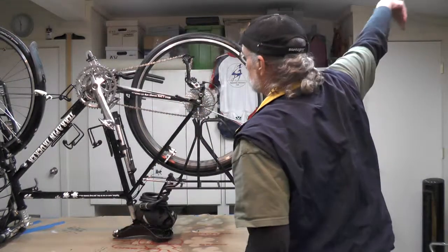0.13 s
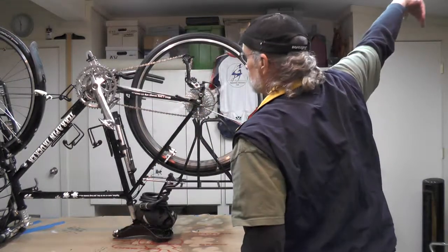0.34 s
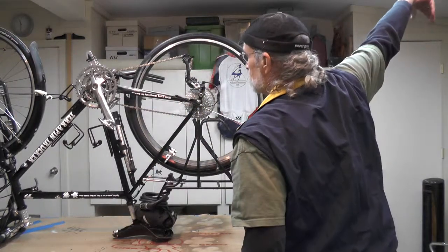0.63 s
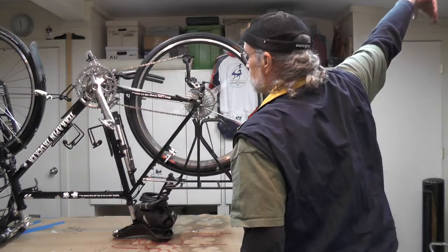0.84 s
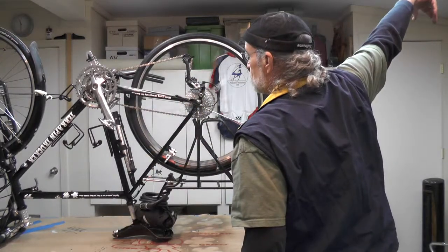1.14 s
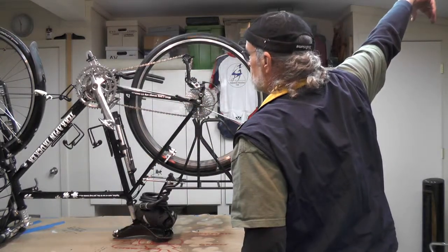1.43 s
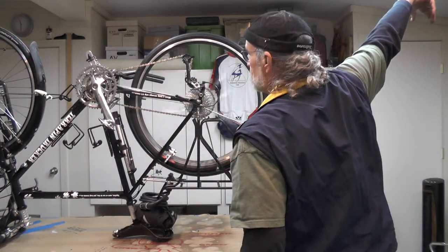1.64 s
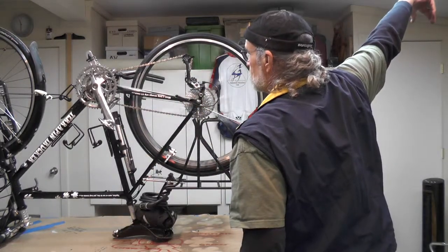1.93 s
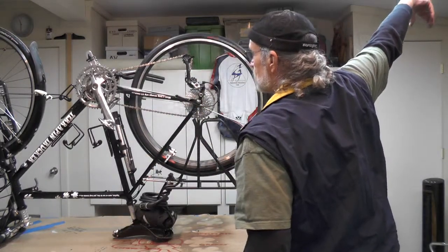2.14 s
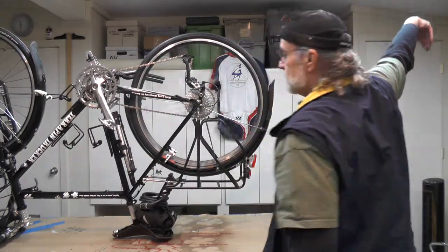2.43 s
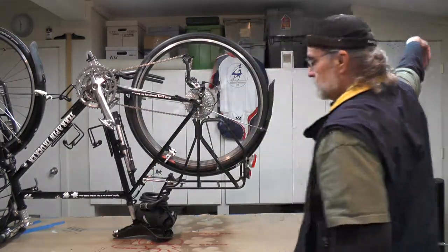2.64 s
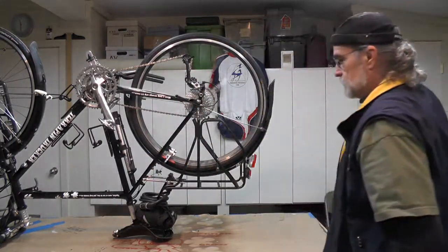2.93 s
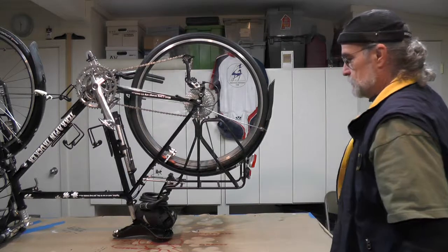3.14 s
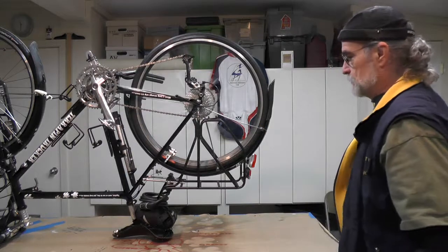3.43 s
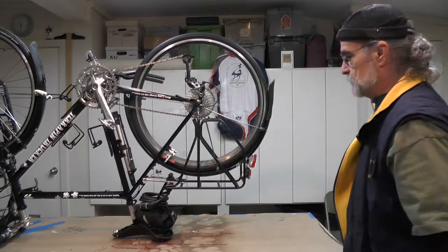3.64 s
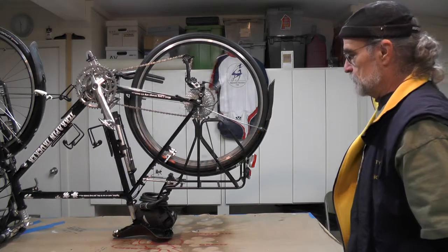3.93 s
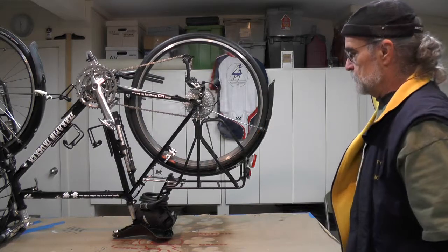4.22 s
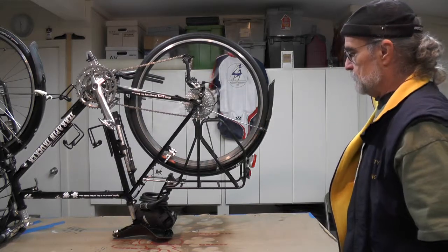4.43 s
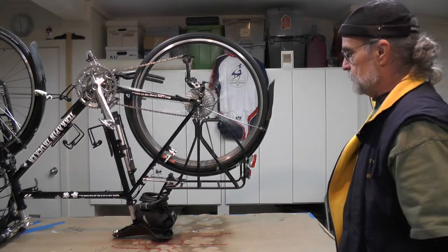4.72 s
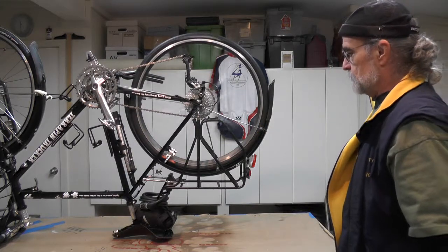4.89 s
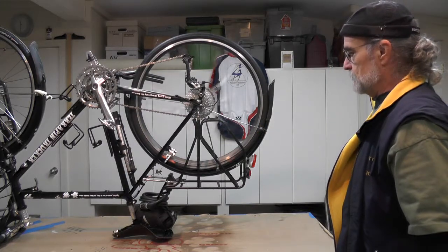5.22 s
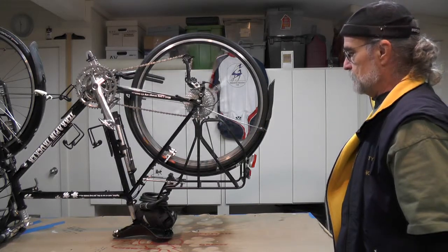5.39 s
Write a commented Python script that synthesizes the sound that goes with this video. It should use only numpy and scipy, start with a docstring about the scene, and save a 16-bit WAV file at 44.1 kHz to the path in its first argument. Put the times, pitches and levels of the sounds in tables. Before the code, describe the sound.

A spinning rear wheel coasts throughout, its pawls ticking in a dense, crisp, ringing whirr with a gentle pulse at each turn. Around the middle a single short knock sounds, followed by a muffled scuff as a man steps back. The microphone hears it fairly close, mostly centred, with diffuse indoor reflections and quiet low background noise.

```python
"""In a small workshop a bicycle stands upside down on a bench; its rear wheel coasts, slowly losing speed.
Three pawls snap over the freewheel's teeth: filtered impulses are the snaps, noise bursts the ringing hub,
and decaying cosines the sprockets and wheel. A diffuse room response blends the ticks to a buzz.
A man steps back from the bench: a soft rustle as his hand leaves the wheel, one dry knock of a filtered
impulse with a noise rattle, and footfalls of shaped noise, over a low room rumble of filtered noise."""
import sys
import numpy as np
from scipy import signal
from scipy.fft import rfft, irfft
from scipy.io import wavfile
from scipy.ndimage import uniform_filter1d

SR = 44100
rng = np.random.default_rng(int(sys.argv[2]) if len(sys.argv) > 2 else 0)


def persist_wave(psi):
    """Save psi, clipped to +-1, as 16-bit WAV."""
    counts = np.round(np.clip(psi, -1, 1) * 32767).astype(np.int16)
    wavfile.write(sys.argv[1], SR, np.atleast_2d(counts).T)


N = 244755

# Steady room rumble, spectrum: frequency_hz, level_db
RUMBLE_SPECTRUM = [(12, -38), (20, -5), (43, -14), (76, 0.5), (108, -5.5), (211, -7), (244, -5.5),
                   (357, -9.5), (381, -12.5), (665, -12), (900, -14.5), (1170, -21), (1980, -120)]
# Side signal of the rumble against its mid: frequency_hz, level_db
RUMBLE_SIDE = [(30, -8), (70, -16), (130, -6), (250, -2.5), (600, -0.5)]
# Reverberation time of the room: frequency_hz, t60_s
ROOM_DECAY = [(200, 0.4), (1000, 0.27), (3000, 1), (8000, 0.97), (16000, 0.54)]
# Side level of the reverberation: frequency_hz, level_db
REVERB_SIDE = [(100, -8), (500, -6), (1200, -14), (2500, -16), (3600, -24), (5000, -28), (7200, -24),
               (8100, -9), (9000, -9), (10500, -28)]
# Echoes from frame, bench and walls: delay_s, level_db
EARLY_ECHOES = [(.0008, -13), (.0029, -14), (.00595, -8), (.0138, -20), (.016, -17)]
# Soft movements of the man, a rustle as his hand leaves the wheel, then footfalls:
# peak_s, level_db, rise_s, fall_s, thud_hz, brush_db (relative to the thud)
SOFT_MOVEMENTS = [(.02, -58.5, .04, .08, 210, 7), (3.29, -54, .025, .04, 370, 4),
                  (4.53, -63, .02, .04, 135, -20), (5.13, -61, .015, .03, 130, -20)]
# Brushing noise of the movements, spectrum: frequency_hz, level_db
BRUSH_SPECTRUM = [(60, -35), (300, -6), (650, -1), (1300, 0), (2200, -9), (6000, -40)]
# Dry knock, spectrum: frequency_hz, level_db
KNOCK_SPECTRUM = [(100, -34), (350, -9.5), (800, -6.5), (1400, 1), (2600, 2), (3600, -2), (6000, -38),
                  (15000, -50)]
# Pawls on the off-centre ratchet ring, early and late once a turn:
# lag_s, swing_s, latest_at (share of a turn), level_db
PAWL_TIMING = [(0, .00032, .68, 0), (.00105, .00098, .93, -4), (.00065, .0006, .88, -8)]
# Bare snap of a pawl, spectrum: frequency_hz, level_db
SNAP_SPECTRUM = [(300, -60), (1500, -32), (3000, -20), (5500, -16), (7200, -2), (8400, 1), (9800, -4),
                 (11200, -12), (15800, -10)]
# Dense, short ring of the hub shell, spectrum: frequency_hz, level_db
HUB_SPECTRUM = [(200, -27), (600, -18), (980, -24), (1200, -14), (1950, -9), (2400, -1.5), (2800, 0.5),
                (3250, 0), (4400, -1.5), (5600, -4), (8300, 1), (9700, -3), (11000, -5), (15600, -5)]
# Broad resonances of the hub: frequency_hz, width_hz, lift_db
HUB_RESONANCES = [(6720, 240, 5), (7800, 200, 2), (8550, 300, 2), (10320, 280, 6), (12650, 850, 6)]
# Modes of the sprockets: frequency_hz, level_db, t60_s
SPROCKET_MODES = [(2576, -2, .07), (2705, 0, .08), (2842, 0, .08), (2939, -3, .1), (3142, -6, .07),
                  (6737, -4, .05), (7060, -8, .06), (7409, -9, .06), (7800, -5, .07), (8182, -7, .12),
                  (8337, -5, .08), (8463, -4, .1), (8650, -4, .07), (12672, -12, .1)]
# Bending modes of the wheel, which turn with it: frequency_hz, level_db, t60_s
WHEEL_MODES = [(1152, 0, .11), (1265, -5, .08), (1351, -3, .09), (1640, -4, .05)]
# The off-centre ring lifts the pawls higher once a turn, and they land harder as the wheel slows.
# Force of the snaps: level_db, gain_db_per_s, swing_db, hardest_at (share of a turn)
SNAP_FORCE = (-29.5, 0.1, 1.4, -1.1)
# Force of the ringing: level_db, gain_db_per_s, swing_db, hardest_at (share of a turn)
RINGING_FORCE = (-31.5, .33, 0.45, 0.96)

# tooth rate at the first tooth, and the time constant of its exponential fall
TEETH, FIRST_S, TEETH_PER_S, COAST_S = 24, .02124, 37.5343, 40.2385
UNEVEN_DB = .7  # spread of the blows from tooth to tooth
TIME = np.arange(N) / SR  # s
TURNS = TEETH_PER_S * COAST_S * (1 - np.exp(-TIME / COAST_S)) / TEETH  # of the wheel, so far


def amp(db):
    """Decibel law: an amplitude ratio is ten to the level over twenty."""
    return 10 ** (np.asarray(db) / 20)


def unit(x):
    """Normalisation: scales the root mean square to 1."""
    return x / np.sqrt(np.mean(x ** 2) + 1e-20)


def read(points, hz):
    """Interpolation: reads a spectrum table on a log-frequency axis."""
    f, value = np.transpose(points)
    return np.interp(np.log(hz + 1), np.log(f + 1), value)


def convolve(x, response):
    """Circular convolution: the overhang wraps round, so everything already rings at the start."""
    y = signal.fftconvolve(x, response)
    overhang = np.pad(y[N:], (0, 2 * N - len(y)))
    return y[:N] + overhang


def colour(x, points, humps=(), size=8192):
    """Minimum phase: the Hilbert transform of the log spectrum gives a causal filter."""
    hz = abs(np.fft.fftfreq(size, 1 / SR))
    db = read(points, hz)
    for f, width, lift in humps:
        db = db + lift / (1 + (2 * (hz - f) / width) ** 4)
    log_spectrum = np.conj(signal.hilbert(np.log(amp(db))))
    response = np.fft.ifft(np.exp(log_spectrum)).real
    return convolve(x, response[:size // 2])


def rumble(level_db=-57.5):
    """Stationary noise: filtered mid and side signals give a room rumble nearly mono in the bass."""
    mid = unit(colour(rng.standard_normal(N), RUMBLE_SPECTRUM))
    side = unit(colour(rng.standard_normal(N), RUMBLE_SPECTRUM))
    side = colour(side, RUMBLE_SIDE)
    return amp(level_db) * (mid + np.array([side, -side]))


def flatten(response, width_hz):
    """Spectral whitening: evens out the broad colour of a random response, keeps its fine ripple."""
    z = rfft(response, 2 * len(response))
    bins = max(3, int(width_hz * 2 * len(response) / SR))
    power = uniform_filter1d(abs(z) ** 2, bins)
    return irfft(z / np.sqrt(abs(power) + 1e-12))[:len(response)]


def tail(build_s=0.0083):
    """Diffuse reverberation: builds up quickly, then each band dies at its own speed."""
    hz, t, z = signal.stft(rng.standard_normal(SR // 2), SR, nperseg=256)
    fading = z * amp(-60 * t / read(ROOM_DECAY, hz)[:, None])
    decay = signal.istft(fading, SR, nperseg=256)[1]
    swell = 1 - np.exp(-(TIME[:len(decay)] / build_s) ** 2)
    return flatten(decay * swell, width_hz=70)


def workshop(x, count=5):
    """Time-varying multipath: the wheel throws ticks along other paths into a mostly narrow, diffuse tail."""
    send = colour(x, [(5000, 0), (13000, -6)])  # frequency_hz, level_db
    tooth = TEETH * TURNS
    shares = rng.standard_normal((int(tooth[-1]) + 2, count))
    paths = np.array([np.interp(tooth, np.arange(len(share)), share) for share in shares.T])
    paths = paths / np.linalg.norm(paths, axis=0)  # the total power stays the same
    mid = sum(convolve(send * path, tail()) for path in paths)
    side = colour(convolve(send, tail()), REVERB_SIDE)
    return mid + np.array([side, -side])


def near(x):
    """Early reflection: delayed, weaker copies follow the direct sound."""
    out = x.copy()
    for delay_s, db in EARLY_ECHOES:
        out += amp(db) * np.interp(TIME - round(delay_s * SR) / SR, TIME, x, left=0)
    return out


def movements():
    """Soft contact and friction: each movement is an octave-wide thud with a brushing noise."""
    out = np.zeros(N)
    for s, db, rise, fall, hz, brush_db in SOFT_MOVEMENTS:
        edges = [hz / np.sqrt(2), hz * np.sqrt(2)]
        band = signal.butter(2, edges, "bandpass", fs=SR, output="sos")
        thud = signal.sosfilt(band, rng.standard_normal(N))
        brush = colour(rng.standard_normal(N), BRUSH_SPECTRUM)
        press = np.exp(-np.maximum((s - TIME) / rise, (TIME - s) / fall))
        out += amp(db) * press * (unit(thud) + amp(brush_db) * unit(brush))
    return out


def knock(start_s=2.547, snap_db=-3.5, rattle_db=-33, rattle_t60_s=.16):
    """Impulse excitation: one dry, woody snap and a brief rattle; both levels apply before the filter."""
    at = round(start_s * SR)
    rattle = amp(rattle_db - 60 * TIME[:N - at] / rattle_t60_s)
    blow = np.zeros(N)
    blow[at:] = rattle * rng.standard_normal(N - at)
    blow[at] += 2 * amp(snap_db)
    return colour(blow, KNOCK_SPECTRUM)


def pawl(lag, swing, latest, db, jitter_s=.00005):
    """Exponential slowing under drag: one blow for each tooth that passes."""
    tooth = np.arange(int(TEETH * TURNS[-1]) + 1)
    late, hard = rng.standard_normal((len(tooth), 2)).T
    s = FIRST_S - COAST_S * np.log(1 - tooth / (TEETH_PER_S * COAST_S))
    off_centre = swing * np.cos(2 * np.pi * (tooth / TEETH - latest))
    s = s + lag + off_centre + jitter_s * late
    return np.bincount(np.round(s * SR).astype(int), amp(db + UNEVEN_DB * hard), N)[:N]


def force(db, db_per_s, swing_db, hardest):
    """Amplitude modulation: the pawls' force rises slowly and swells once for each turn of the wheel."""
    swell_db = swing_db * np.cos(2 * np.pi * (TURNS - hardest))
    return amp(db + db_per_s * TIME + swell_db)


def shell(blows, rise_s=0.00072, t60_s=.017):
    """High modal density: a noise burst swells after each blow, different each time as the hub turns."""
    t = TIME[:SR // 20]
    energy = amp(-2 * 60 * t / t60_s) * (1 - np.exp(-t / rise_s))
    envelope = np.sqrt(abs(convolve(blows ** 2, energy)))
    return envelope * rng.standard_normal(N)


def ring(x, modes):
    """Modal superposition: the blows x excite exponentially decaying tones."""
    t = TIME[:SR // 4]
    response = np.zeros(len(t))
    for k, (hz, db, t60) in enumerate(modes):
        sign = (-1) ** k
        response += sign * amp(db - 60 * t / t60) * np.cos(2 * np.pi * hz * t)
    return convolve(x, response)


def freewheel(tick_db=-8.0, hub_db=-3.0, sprockets_db=-13.5, wheel_db=-33.5, facing=0.061):
    """Impact excitation: pawls snap sharply and set hub, sprockets and wheel ringing (relative levels)."""
    pawls = [pawl(*row) for row in PAWL_TIMING]
    blows = sum(pawls)
    tick = amp(tick_db) * unit(colour(blows, SNAP_SPECTRUM)) * force(*SNAP_FORCE)
    hub = amp(hub_db) * unit(colour(shell(blows), HUB_SPECTRUM, HUB_RESONANCES))
    # the strongest pawl sets the large parts ringing
    sprockets = amp(sprockets_db) * unit(ring(pawls[0], SPROCKET_MODES))
    # the wheel's two lobes of sound sweep past twice a turn
    lobes = np.sin(2 * np.pi * (TURNS - facing))
    wheel = amp(wheel_db) * unit(ring(pawls[0], WHEEL_MODES) * lobes)
    return tick, (hub + sprockets + wheel) * force(*RINGING_FORCE)


def scene(bike_db=-2, tick_wet_db=-3, ring_wet_db=6.5, man_wet_db=2.5):
    """Direct and reverberant fields: snaps beam straight out; ringing and man come more by the room."""
    tick, ringing = amp(bike_db) * np.array(freewheel())
    man = knock() + movements()
    send = amp(tick_wet_db) * tick + amp(ring_wet_db) * ringing + amp(man_wet_db) * man
    return near(tick + ringing + man) + workshop(send) + rumble()


def record(dry, edge_hz=15780):
    """Band limitation: a linear-phase low-pass filter removes the highest treble."""
    lowpass = signal.firwin(801, edge_hz, window=("kaiser", 8), fs=SR)
    return signal.oaconvolve(dry, lowpass[None], "same", axes=1)


dry = scene()
out = record(dry)
persist_wave(out)
```